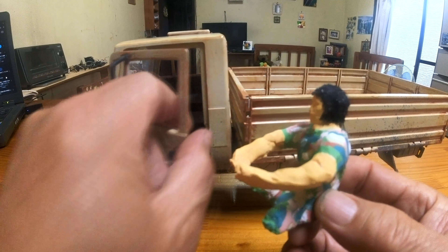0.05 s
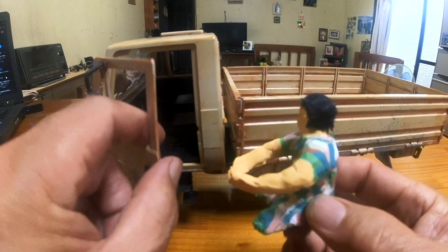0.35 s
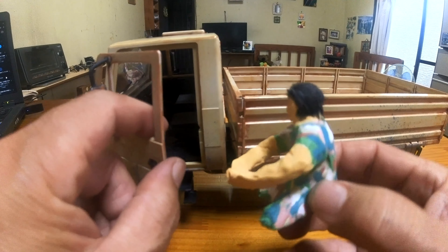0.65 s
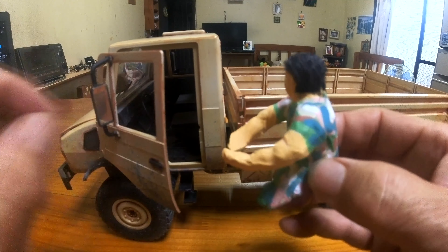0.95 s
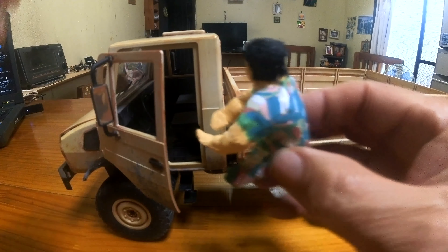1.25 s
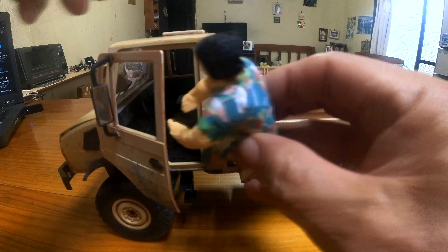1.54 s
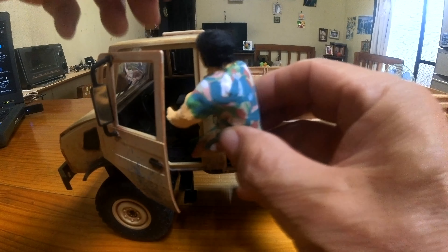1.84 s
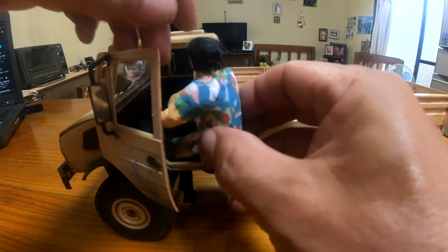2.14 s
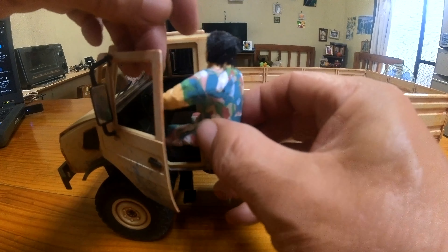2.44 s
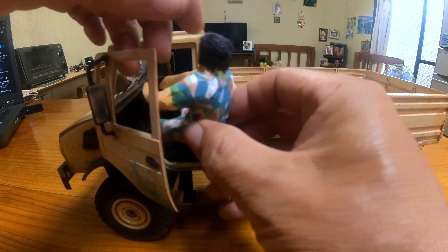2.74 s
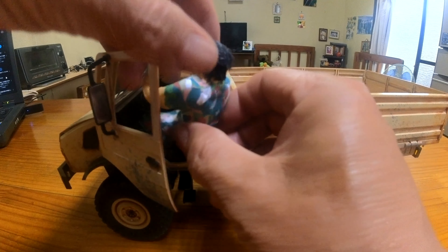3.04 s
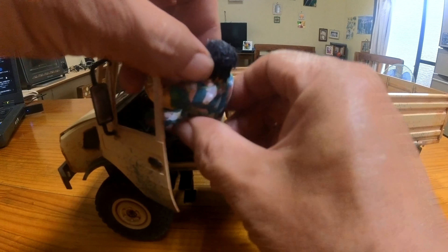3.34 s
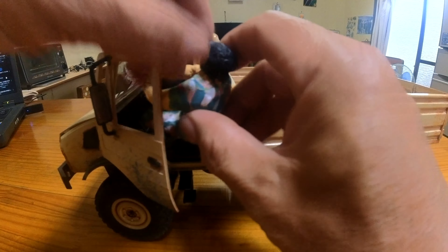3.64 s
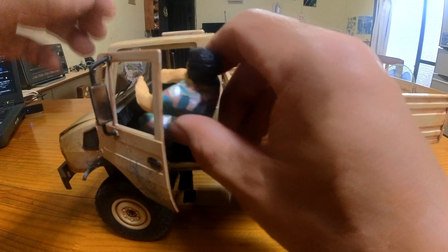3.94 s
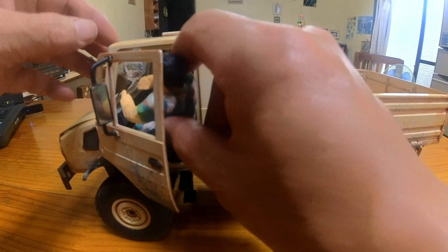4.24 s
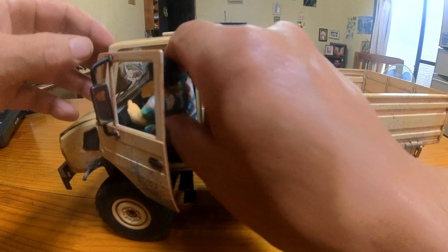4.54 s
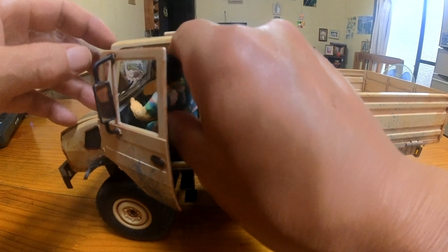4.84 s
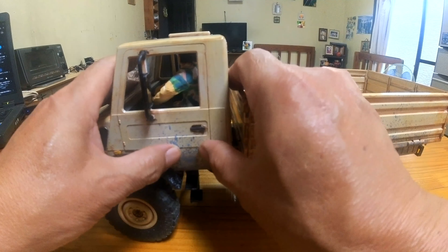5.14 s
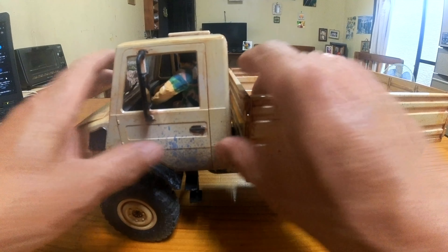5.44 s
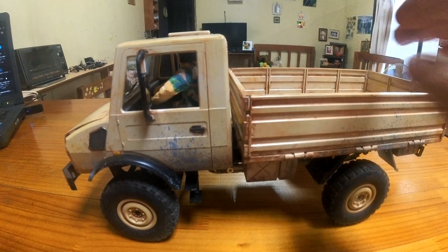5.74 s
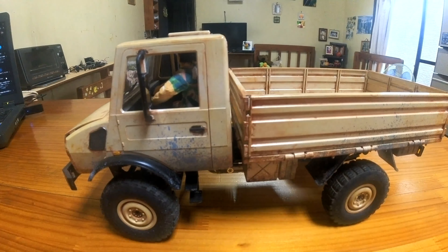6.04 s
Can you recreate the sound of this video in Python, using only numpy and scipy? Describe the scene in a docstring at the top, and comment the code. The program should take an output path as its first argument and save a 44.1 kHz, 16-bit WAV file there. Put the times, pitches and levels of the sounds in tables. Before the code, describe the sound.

A small plastic truck's door rasps open, a figure knocks and grates inside, and the door clicks closed in a quiet room.

```python
"""Hands seat a toy figure in the cab of a plastic model truck on a wooden table, close to the microphone.
The door drags open, the figure scrapes and knocks its way in, the door clicks shut, the truck rocks on
its tyres. Knocks make the plastic ring; scrapes are many tiny jerks as parts stick and slip.
A small room echoes the contacts. Hiss, a low hum, thin whines and faint chirps lie underneath."""
import sys
import numpy as np
from scipy import signal
from scipy.fft import rfft, irfft
from scipy.io import wavfile

SR = 44100
rng = np.random.default_rng(int(sys.argv[2]) if len(sys.argv) > 2 else 0)


def materialize(psi):
    """Save the field psi as 16-bit PCM at rate SR to the path in sys.argv[1].

    A 1-D psi becomes a single channel; in a 2-D psi each row is a channel.
    """
    bounded = np.clip(np.atleast_2d(psi).T, -1, 1)
    quanta = np.round(bounded * 32767).astype(np.int16)
    wavfile.write(sys.argv[1], SR, quanta)


N = 276948
HIT_SIZE = 22050  # samples in one short sound (half a second)

# The parts named in the tables of pushes and jolts.
# pitches each part rings at: pitch_hz, width_hz, gain_db
SEAT = [(296, 31, 10.5), (422, 30, 6.5), (570, 77, 0), (825, 120, 10.5), (1010, 200, 12), (1324, 43, 16.5),
        (1450, 51, 8.5), (1665, 130, 7), (2010, 330, 5), (2410, 71, 3.5), (2620, 160, -2),
        (3240, 420, -3.5), (5175, 240, 0), (5720, 120, -4.5), (6460, 400, -10.5)]  # seat under the sliding figure
WALL = [(432, 83, -8), (785, 72, -4), (1016, 67, 5), (1235, 100, 2), (1430, 150, 0), (1645, 120, -3.5),
        (2410, 180, -2), (2880, 270, -9.5), (3600, 300, -19), (4450, 180, -12.5), (5180, 280, -12.5)]  # back wall of the cab
CATCH = [(710, 100, -19), (920, 69, -5), (996, 51, 3), (1410, 250, -3), (1740, 120, -3.5), (1980, 210, 4),
         (2480, 380, -3), (2770, 240, -10), (3230, 230, -7.5), (3680, 150, -13), (5140, 840, -17),
         (6250, 560, -21.5), (6900, 200, -27)]  # door skin as the catch rides over the post
RIM = [(726, 46, 6), (1025, 120, -9), (1340, 92, 1.5), (1730, 220, -1.5), (2130, 330, -10), (2880, 300, -5),
       (3520, 170, -5), (4430, 360, -12), (5170, 220, -2), (5850, 130, -15)]  # door rim creeping home
CAB = [(150, 52, 5), (225, 93, 8), (315, 87, 7.5), (404, 94, 6.5), (626, 40, 0), (753, 93, 8.5),
       (893, 150, 12.5), (1050, 190, 3), (1253, 150, 9), (1700, 95, -0.5), (1990, 210, -1),
       (2280, 490, -4.5), (2700, 290, 0.5), (3550, 300, -18), (4850, 440, -12)]  # cab knocked from inside
FIGURE = [(758, 41, 12), (863, 62, 8), (1490, 86, 6.5), (2210, 240, -4), (2690, 140, 7), (2950, 130, 3.5),
          (3715, 210, 12.5), (4800, 72, 12), (5250, 165, 8), (6200, 450, -13), (7200, 500, -11),
          (7940, 420, -14.5), (10000, 730, -34)]  # the figure's hard shell
DOOR_EDGE = [(741, 100, 2), (1710, 130, -13), (2270, 300, -20.5), (4240, 230, -33), (5400, 220, -36)]  # door edge meeting the post
FRAME = [(313, 63, 14), (422, 70, 14), (530, 130, 11.5), (623, 53, 18.5), (733, 60, 17.5), (850, 140, 9),
         (1085, 89, 9.5), (1420, 300, 4.5), (2280, 97, 9.5), (2560, 190, 11.5), (2990, 210, 14.5),
         (3630, 350, -3), (5100, 700, -22)]  # frame with the door shut in it
# which side each part's sound leans to: pitch_hz, left_minus_right_db
SEAT_LEAN = [(60, 4), (100, -13), (180, -7), (300, -4.5), (520, 10), (880, -0.5), (1510, 1), (2580, 5.5),
             (4420, -9), (7570, -25)]
WALL_LEAN = [(60, -1), (100, -4), (180, -7), (300, -8), (520, -1.0), (880, 3), (1510, 1), (2580, 19),
             (4420, 1), (7570, -9)]
CATCH_LEAN = [(60, 0.5), (100, 3.5), (180, -4), (300, 0), (520, 0.5), (880, 1.5), (1510, 2), (2580, 5),
              (4420, -1), (7570, -16)]
RIM_LEAN = [(60, 10), (100, 6), (180, 0), (300, 0.0), (520, -7), (880, 7), (1510, -1), (2580, 7),
            (4420, -6), (7570, -26)]
CAB_LEAN = [(60, 15), (100, -3), (180, 3), (300, -4), (520, 7.5), (880, 0), (1510, 4), (2580, 11),
            (4420, 7), (7570, -15)]
FIGURE_LEAN = [(60, 8), (100, 5), (180, -2.5), (300, 6), (520, 9), (880, 4), (1510, 8), (2580, 2),
               (4420, -11.5), (7570, -18)]
DOOR_EDGE_LEAN = [(60, 5), (100, 3), (180, 11), (300, 7), (520, -3.5), (880, 3.0), (1510, 10), (2580, 10),
                  (4420, -15), (7570, -4.0)]
FRAME_LEAN = [(60, 0), (100, 0), (180, 5), (300, -2.5), (520, -2), (880, 3), (1510, 2.5), (2580, 4.5),
              (4420, -2), (7570, 7)]


def undb(db):
    """Turn decibels into a factor to multiply by."""
    return 10 ** (np.asarray(db) / 20)


def unit(x):
    """Scale a sound to an average (rms) level of 1."""
    return x / np.sqrt(np.mean(x ** 2) + 1e-30)


def lookup(table, hz):
    """Read between the rows of a (pitch_hz, value) table, giving each octave equal room."""
    points, values = np.transpose(table)
    return np.interp(np.log(hz + 1), np.log(points), values)


def band(x, low_hz, high_hz, order=5):
    """Keep the sound between two pitches."""
    sos = signal.butter(order, [low_hz, min(high_hz, SR / 2 - 1)], "band", fs=SR, output="sos")
    return signal.sosfilt(sos, x + 1e-18)


def shape(x, table):
    """Filter by (pitch_hz, gain_db) points, with no ringing ahead of the sound."""
    size = 2 * HIT_SIZE
    hz = np.arange(HIT_SIZE + 1) * SR / size
    cepstrum = irfft(np.log(undb(lookup(table, hz))))
    # move the filter's early half to after the sound
    cepstrum[1:HIT_SIZE] *= 2
    cepstrum[HIT_SIZE + 1:] = 0
    return irfft(rfft(x, size) * np.exp(rfft(cepstrum)))[:, :HIT_SIZE]


def wander(turns_per_s, size):
    """A random drift, mostly between -1 and 1."""
    at = np.arange(size) / SR * turns_per_s
    return np.interp(at, np.arange(4096), rng.standard_normal(4096))


def add(out, start_s, sound):
    """Mix a sound in at its start time."""
    start = max(int(start_s * SR), 0)
    sound = sound[:, :N - start]
    out[:, start:start + sound.shape[1]] += sound


def stereo_noise(alike_hz=2300, bass_width=.2):
    """Noise whose left and right are alike in the bass and unrelated in the treble."""
    hz = np.arange(HIT_SIZE // 2 + 1) * SR / HIT_SIZE
    width = np.hypot(bass_width, hz / np.hypot(hz, alike_hz))
    mid, side = rfft(rng.standard_normal((2, HIT_SIZE)))
    return irfft((mid + width * side * np.array([[1], [-1]])) / np.hypot(1, width), HIT_SIZE)


def background(hiss_db=-69):
    """Steady room hiss with a wavering hum and two thin whines."""
    # tone of the quiet room: pitch_hz, gain_db
    air_tone = [(20, -33), (50, 1.5), (76, -3.5), (110, -6), (230, -8.5), (500, -15.5), (1000, -17),
                (2500, -21), (3600, -20), (5300, -16.5), (7800, -27.5), (10400, -42.5), (15500, -45),
                (17000, -75)]
    # what differs between the ears (side) against what they share (mid): pitch_hz, side_db
    air_width = [(50, -4.5), (150, -4), (900, -4), (2500, -1), (5000, 0.5)]
    # hum and whines: pitch_hz, level_db, waver_fraction
    tones = [(49, -73, .4), (1007, -78.5, .35), (8005, -95, .9)]
    hz = np.arange(N // 2 + 1) * SR / N
    mid, side = irfft(rfft(rng.standard_normal((2, N))) * undb(lookup(air_tone, hz)), N)
    side = irfft(rfft(side) * undb(lookup(air_width, hz)), N)
    audible_level = np.std(band(mid, 100, 15500))
    air = (mid + side * np.array([[1], [-1]])) / audible_level * undb(hiss_db)
    t = np.arange(N) / SR
    for pitch_hz, level_db, waver in tones:
        sway = 1 + waver * (wander(39, N) + 1j * wander(29, N))  # shakes level and pitch
        air += undb(level_db) * unit(np.real(sway * np.exp(2j * np.pi * pitch_hz * t)))
    return air


def room_echo(build_s=0.0036):
    """The echo of one click off table and walls; the treble dies first."""
    # time the echo takes to fall 60 dB: pitch_hz, fade_s
    fades = [(150, 0.14), (500, 0.21), (1000, 0.22), (3000, 0.21), (8000, 0.097)]
    t = np.arange(HIT_SIZE) / SR
    noise = stereo_noise(alike_hz=2120, bass_width=0.22)
    edges_hz = np.geomspace(60, 15360, 9)
    echo = sum(band(noise, low, high, order=3) * undb(-60 * t / lookup(fades, np.sqrt(low * high)))
               for low, high in zip(edges_hz, edges_hz[1:]))
    echo *= 1 - np.exp(-(t / build_s) ** 2)
    return echo / np.sqrt(np.sum(echo ** 2) / 2)


def in_room(x, echo, echo_db):
    """The direct sound plus its echo."""
    return x + undb(echo_db) * signal.fftconvolve(np.atleast_2d(x), echo, axes=1)[:, :HIT_SIZE]


def glide(length_s, first_hz, last_hz, jitter, roughness):
    """A rough tone that swells, slides to its last pitch and fades."""
    progress = np.minimum(np.arange(HIT_SIZE) / SR / length_s, 1)
    hz = last_hz + (first_hz - last_hz) * (1 - progress) ** 2
    hz *= 1 + jitter * wander(153, HIT_SIZE)
    flutter = 1 + roughness * (wander(164, HIT_SIZE) + 1j * wander(170, HIT_SIZE))
    swell = np.sin(np.pi * np.sqrt(progress))
    return swell * np.imag(flutter * np.exp(2j * np.pi * np.cumsum(hz) / SR))


def chirps(echoes, length_s=0.0754, gain_db=-1):
    """Very faint high chirps, like birds beyond the window."""
    # chirps: start_s, first_hz, last_hz, level_db (before gain_db)
    notes = [(.3, 3500, 3670, -66.5), (.65, 3670, 3600, -74), (1.28, 3220, 3030, -78),
             (1.37, 3150, 2940, -76), (1.45, 2980, 2880, -80), (1.78, 3500, 3640, -74),
             (2.2, 3290, 3460, -69.5), (2.37, 3570, 3660, -70), (3.95, 3360, 3240, -74),
             (4.33, 3560, 3560, -78), (5.87, 2990, 3150, -75.5), (6, 3120, 3020, -68)]
    out = np.zeros((2, N))
    for k, (start_s, first_hz, last_hz, level_db) in enumerate(notes):
        note = glide(length_s, first_hz, last_hz, jitter=.018, roughness=.9)
        add(out, start_s, undb(level_db + gain_db) * in_room(note, echoes[k % len(echoes)], echo_db=-3))
    return out


def finger_rustle(patchy_db=6, touches_per_s=14, hands_off_s=5.6):
    """Fingers shift their grip, rustling in faint patches until they let go."""
    # skin on plastic: pitch_hz, width_hz, level_db
    rustle_bands = [(2996, 480, -79.5), (3596, 350, -78), (5220, 720, -86.5)]
    holding = np.clip((hands_off_s - np.arange(N) / SR) * 10, 0, 1)
    out = 0
    for hz, width_hz, level_db in rustle_bands:
        touch_db = patchy_db * wander(touches_per_s, N).clip(-2, 2) + 2 * wander(10 * touches_per_s, N)
        hiss = band(rng.standard_normal((2, N)), hz - width_hz / 2, hz + width_hz / 2, order=2)
        out += undb(level_db) * unit(undb(touch_db) * hiss)
    return out * holding


def squeaks(echo):
    """Hinge and fingertips slip so regularly that they make a sliding tone."""
    # squeaks: start_s, length_s, first_hz, last_hz, level_db
    slides = [(0.386, 0.14, 1480, 1255, -64), (1.173, 0.077, 294, 265, -62),
              (3.89, 0.067, 2720, 2650, -63.5), (3.955, 0.066, 967, 1060, -63),
              (3.958, 0.103, 2520, 2760, -66), (4.17, 0.067, 2510, 2470, -68),
              (4.925, 0.13, 337, 271.4, -47)]
    out = np.zeros((2, N))
    for start_s, length_s, first_hz, last_hz, level_db in slides:
        tone = glide(length_s, first_hz, last_hz, jitter=.025, roughness=.55)
        add(out, start_s, undb(level_db) * in_room(tone, echo, echo_db=-7))
    return out


def ring(hz, fade_s):
    """One note of a struck object, falling 60 dB in fade_s."""
    t = np.arange(HIT_SIZE) / SR
    return np.sin(2 * np.pi * hz * t) * undb(-60 * t / fade_s)


def tyre_thumps(echoes, push_s=0.0013, gain_db=-1):
    """Soft pushes set the truck bouncing on its tyres and the table top."""
    # bounces: start_s, peak_db (before gain_db), pitch_hz, fade_s
    bounces = [(.488, -49.5, 47.6, 0.013), (.728, -42, 146, 0.062), (.992, -41.5, 133.5, 0.32),
               (1.048, -46, 128.7, 0.19), (1.123, -50, 66, 0.083), (2.8405, -29, 192, 0.037),
               (2.854, -38.5, 256, 0.08), (4.82, -46, 152.2, 0.33), (4.842, -39.5, 55, 0.087),
               (5.133, -50, 282, 0.061), (5.434, -42.5, 173, 0.13), (5.498, -38.5, 124, 0.021),
               (5.598, -52, 137, 0.13)]
    out = np.zeros((2, N))
    push = 1 - np.exp(-np.arange(HIT_SIZE) / SR / push_s)
    for k, (start_s, peak_db, hz, fade_s) in enumerate(bounces):
        bounce = in_room(ring(hz, fade_s) * push, echoes[k % len(echoes)], echo_db=-2)
        add(out, start_s, undb(peak_db + gain_db) * bounce / np.abs(bounce).max())
    return out


def cab_shell(scatter_db=7.5, detune=0.012, held_fade_s=.21):
    """The cab rings differently wherever it is touched; the hands cut long rings short."""
    # the cab's own notes: pitch_hz, gain_db, fade_s (capped at held_fade_s)
    notes = [(264, 27.5, 0.0061), (318, -9, 0.12), (405, -16, 0.12), (490, 0, 0.018), (588, -2, 0.12),
             (737, -4, 0.14), (818, 14.5, 0.024), (980, -32, 0.25), (983, -0.5, 0.61), (1144, 14, 0.013),
             (1114, -22, 0.011), (1307, -19, 0.055), (1420, -7, 0.25), (1745, 2, 0.015), (2060, -35, 0.074),
             (2224, -3.5, 0.057), (2400, -8.5, 0.019), (2470, -6, 0.011), (3050, 8, 0.015),
             (3420, 2, 0.063), (3500, -11, 0.05), (5020, -1, 0.048), (5200, -33, 0.036),
             (6000, -13, 0.0098)]
    chance = rng.standard_normal((len(notes), 3))
    out = 0
    for (hz, gain_db, fade_s), (size, grip, side) in zip(notes, chance):
        strength = np.sign(side) * undb(gain_db + scatter_db * size)
        out += strength * ring(hz * (1 + detune * grip), min(fade_s, held_fade_s))
    return out


def panel(low_hz, high_hz, fade_s, high_db):
    """The touched part rings at two pitches of its own."""
    return ring(low_hz, fade_s) + undb(high_db) * ring(high_hz, fade_s)


def crack(contact_s):
    """Touching edges shake in a very short burst of noise."""
    age = np.arange(HIT_SIZE) / SR / contact_s
    burst = stereo_noise(alike_hz=2750, bass_width=0.13) * age * np.exp(-age)
    return burst / np.sqrt(np.sum(burst ** 2) / 2)


def through_body(x, level_db, low_hz, high_hz, tilt, fall, seconds):
    """The body and the touched part colour a contact, set to level_db over its first seconds."""
    # how well the plastic body gives off sound: pitch_hz, gain_db
    body_tone = [(80, -0.5), (160, -11.5), (260, 7.5), (400, 6), (500, -3), (680, 0.5), (1000, 5),
                 (1300, 0), (2200, 6), (3000, 0), (3650, 2.5), (4250, 6.5), (5200, -8), (7000, 7.5),
                 (10000, -38), (14000, -99.5)]
    # where the cab's sound leans: pitch_hz, left_minus_right_db
    body_lean = [(200, -3), (450, 2.5), (1000, 1.5), (2000, 6), (3100, 16), (3900, -5.5), (5200, -25),
                 (8000, 7.5)]
    margin_octaves, floor_db = 0.032, -29  # the rest of the truck still carries floor_db
    hz = np.geomspace(40, 20000, 80)
    # octaves below, above and between the part's two rings
    over_low, under_high = np.log2(hz / low_hz), np.log2(high_hz / hz)
    below = np.maximum(-over_low - margin_octaves, 0)
    above = np.maximum(-under_high - margin_octaves, 0)
    between = np.maximum(np.minimum(over_low, under_high), 0)
    slope_db = tilt * np.log2(np.clip(hz, low_hz, high_hz) / low_hz)
    part_db = slope_db - 12 * below + between - fall * above
    gain_db = lookup(body_tone, hz) + np.maximum(part_db, floor_db)
    lean_db = lookup(body_lean, hz)
    x = np.vstack([shape(channel[None], np.column_stack([hz, gain_db + side * lean_db / 2]))
                   for channel, side in zip(x, (1, -1))])
    return x * undb(level_db) / np.std(x[:, :int(seconds * SR)])


def through_part(x, part, lean, level_db, seconds):
    """A part boosts the pitches it rings at; the result has level_db over its first seconds."""
    hz = np.geomspace(40, 20000, 900)
    power = sum(undb(peak_db) ** 2 / (1 + ((hz - pitch_hz) / width_hz * 1.5) ** 2) ** 2
                for pitch_hz, width_hz, peak_db in part)
    shares = [2 / (1 + undb(-side * lookup(lean, hz)) ** 2) for side in (1, -1)]  # left, right
    x = np.vstack([shape(channel[None], np.column_stack([hz, 10 * np.log10(power * share + 1e-8)]))
                   for channel, share in zip(x, shares)])
    return x * undb(level_db) / np.std(x[:, :int(seconds * SR)])


def pressure(swell_s, hold_s):
    """A fingertip push builds, holds, then lets go quickly."""
    t = np.arange(HIT_SIZE) / SR
    return np.minimum(t / swell_s, 1) * np.exp(-(np.maximum(t - swell_s, 0) / hold_s) ** 4)


def jerks(spread_db):
    """A random size and direction for each possible slip."""
    size = undb(spread_db * rng.standard_normal(HIT_SIZE).clip(-2, 2))
    return size * np.sign(rng.standard_normal(HIT_SIZE))


def rasp(swell_s, hold_s, slips_per_s, spread_db, grip_db):
    """Tiny slips grow stronger and weaker as the grip catches and gives."""
    strength = jerks(spread_db) * undb(grip_db * wander(174, HIT_SIZE))
    slipping = rng.random(HIT_SIZE) < slips_per_s / SR
    return slipping * strength * pressure(swell_s, hold_s)


def scrapes(echoes, slips_per_s=1500, crack_db=36, panel_db=7):
    """Fingers and loose parts stick and slip on the body, shaking the cab and the sliding part."""
    # scrapes: start_s, swell_s, hold_s, level_db, low_hz, high_hz (the part's two rings),
    # tilt_db_per_octave (between them), fall_db_per_octave (above them)
    strokes = [(.3, 0.0064, 0.1, -61, 384, 1400, -2.5, 6.5), (.485, 0.01, 0.017, -66.5, 230, 3120, 4.5, 0),
               (.73, 0.0023, 0.0033, -60.5, 200, 1420, -1, 22),
               (.96, 0.0046, 0.014, -52, 2400, 2720, -2, 30),
               (3.545, 0.028, 0.036, -61.5, 5150, 5350, -16, 25),
               (3.875, 0.009, 0.023, -59.5, 2010, 3030, 8, 31),
               (4.61, 0.021, 0.045, -61.5, 1010, 2807, 6.5, 20),
               (5.47, 0.0052, 0.053, -50.5, 302, 850, 2, 16)]
    out = np.zeros((2, N))
    for k, (start_s, swell_s, hold_s, level_db, low_hz, high_hz, tilt, fall) in enumerate(strokes):
        slips = jerks(spread_db=3) * (rng.random(HIT_SIZE) < slips_per_s / SR)
        slips *= pressure(swell_s, hold_s)
        rings = cab_shell() + undb(panel_db) * panel(low_hz, high_hz, fade_s=0.078, high_db=0.5)
        one_slip = rings + undb(crack_db) * crack(contact_s=0.0013)
        rub = signal.fftconvolve(slips[None], one_slip, axes=1)[:, :HIT_SIZE]
        heard = in_room(rub, echoes[k % len(echoes)], echo_db=-6)
        add(out, start_s, through_body(heard, level_db, low_hz, high_hz, tilt, fall, swell_s + hold_s))
    return out


def door_pull(echo, start_s=0.97, swell_s=0.0099, hold_s=0.043, level_db=-39.5):
    """The tight door drags out of its frame with a dense rasp, then rings on."""
    # tone of the dragging door: pitch_hz, width_hz, gain_db
    door_tone = [(242, 85, 3.5), (503, 46, -10.5), (838, 89, 2), (964, 82, 11), (1250, 180, 4),
                 (1768, 120, 10), (2070, 300, -0.5), (2360, 160, 2), (2630, 350, 7.5), (3160, 320, 0),
                 (3710, 520, -4), (4930, 660, -15), (7100, 800, -22.5)]
    # where its sound leans: pitch_hz, left_minus_right_db
    door_lean = [(60, 9), (100, 3), (180, 1), (300, -7), (520, 0.5), (880, 5), (1510, -5.5), (2580, 14),
                 (4420, -14), (7570, -10.5)]
    # notes of the freed door: pitch_hz, gain_db, fade_s
    door_notes = [(996, -53.5, 0.22), (1715, -53.5, 0.25), (2382, -54, 0.32), (3120, -50.5, 0.29),
                  (3340, -41, 0.19)]
    out = np.zeros((2, N))
    drag = rasp(swell_s, hold_s, slips_per_s=3000, spread_db=3.5, grip_db=-1)
    rings = sum(undb(gain_db) * ring(hz, fade_s) for hz, gain_db, fade_s in door_notes)
    drag += signal.fftconvolve(drag, rings)[:HIT_SIZE]
    heard = in_room(drag, echo, echo_db=-3)
    add(out, start_s, through_part(heard, door_tone, door_lean, level_db, swell_s + hold_s))
    return out


def latch(start_s=4.9235, gain_db=-41.5, decay_s=.0004):
    """The door catch snaps over with one very short bright tick."""
    out = np.zeros((2, N))
    tick = stereo_noise() * np.exp(-np.arange(HIT_SIZE) / SR / decay_s)
    add(out, start_s, undb(gain_db) * band(tick, 3000, 17000, order=2))
    return out


def knocks(echoes, crack_db=33, panel_db=14):
    """Each blow cracks, then rings the cab and the struck panel; softer blows carry more echo."""
    # knocks on door and cab: start_s, level_db, contact_s, low_hz, high_hz (the panel's two rings),
    # tilt_db_per_octave (between them), fall_db_per_octave (above them)
    blows = [(.0006, -45.5, 0.00098, 370, 870, -11.5, 2), (.2427, -65, 0.0028, 1815, 3050, 9, 25),
             (.2735, -59.5, 0.0017, 936, 1853, 8, 3.5), (.7094, -65.5, 0.002, 753, 1826, 1.5, -3.5),
             (2.0356, -66, 0.00037, 762, 823, -14, 52), (2.188, -69, 0.0079, 430, 425, 6, 15),
             (2.864, -46.5, 0.0055, 950, 1030, -6, 19), (4.085, -67.5, 0.0066, 875, 906, -7, 12),
             (4.419, -56, 0.0058, 397.5, 826, -10.5, 39), (4.472, -64, 0.025, 398, 403, -6, 5.5),
             (4.645, -55.5, 0.0083, 391, 786, 0.5, 9.5), (4.8012, -50, 0.0023, 451, 1520, -4.5, 23),
             (4.819, -56, 0.0002, 754, 1550, -21, 17), (5.2704, -59.5, 0.004, 980, 1310, 0, 8),
             (5.292, -62, 0.0029, 678, 3200, -5.5, 17), (5.388, -51, 0.0017, 1003, 1660, -4.5, 5.5),
             (5.444, -47.5, 0.0025, 390, 720, -3, 9.5)]
    out = np.zeros((2, N))
    t = np.arange(HIT_SIZE) / SR
    for k, (start_s, level_db, contact_s, low_hz, high_hz, tilt, fall) in enumerate(blows):
        rings = cab_shell() + undb(panel_db) * panel(low_hz, high_hz, fade_s=0.031, high_db=1.5)
        blow = rings * (1 - np.exp(-t / contact_s)) + undb(crack_db) * crack(contact_s)
        softness = np.log2(contact_s / .001)
        heard = in_room(blow, echoes[k % len(echoes)], echo_db=-6 + 3 * softness)
        add(out, start_s, through_body(heard, level_db, low_hz, high_hz, tilt, fall, seconds=0.13))
    return out


def shoves(echoes):
    """Tight parts grate in short pushes: the figure into its seat, then the door into its frame."""
    # pushes: start_s, swell_s, hold_s, level_db, lowest_hz, echo_db, part, lean
    pushes = [(3.372, 0.0018, 0.11, -42.5, 660, -5, SEAT, SEAT_LEAN),
              (3.433, 0.011, 0.016, -34, 400, -11, SEAT, SEAT_LEAN),
              (3.464, 0.0023, 0.027, -47, 261, -6, SEAT, SEAT_LEAN),
              (3.643, 0.011, 0.031, -47.5, 300, -12.5, WALL, WALL_LEAN),
              (3.682, 0.003, 0.055, -49.5, 300, -6.5, WALL, WALL_LEAN),
              (4.9225, .001, 0.017, -40.5, 500, -5, CATCH, CATCH_LEAN),
              (4.944, 0.0024, 0.046, -50, 500, -1, CATCH, CATCH_LEAN),
              (5.076, 0.0012, 0.0044, -43, 496, -3, RIM, RIM_LEAN)]
    out = np.zeros((2, N))
    for k, (start_s, swell_s, hold_s, level_db, lowest_hz, echo_db, part, lean) in enumerate(pushes):
        slips = rasp(swell_s, hold_s, slips_per_s=1700, spread_db=4.5, grip_db=1)
        grate = band(slips, lowest_hz, 16000, order=3)
        heard = in_room(grate, echoes[k % len(echoes)], echo_db)
        add(out, start_s, through_part(heard, part, lean, level_db, swell_s + hold_s))
    return out


def clacks(echoes):
    """Hard jolts ring one part each: the figure hits cab and post, then the door hits post and frame."""
    # jolts: start_s, level_db, rattle_s, rattle_db, echo_db, dull_hz (the echo dulls above), part, lean
    jolts = [(2.8395, -40, 0.0014, 5, -2.5, 2000, CAB, CAB_LEAN),
             (3.018, -43, 0.001, -3.5, -8.5, 7100, FIGURE, FIGURE_LEAN),
             (4.9132, -39.5, 0.0012, 11, -9.5, 2000, DOOR_EDGE, DOOR_EDGE_LEAN),
             (5.132, -38.5, 0.0014, -7.5, -1, 1410, FRAME, FRAME_LEAN)]
    out = np.zeros((2, N))
    for k, (start_s, level_db, rattle_s, rattle_db, echo_db, dull_hz, part, lean) in enumerate(jolts):
        jolt = signal.unit_impulse(HIT_SIZE) + undb(rattle_db) * crack(rattle_s)
        heard = in_room(jolt, band(echoes[k], 60, dull_hz, order=1), echo_db)
        add(out, start_s, through_part(heard, part, lean, level_db, seconds=0.088))
    return out


def scene():
    """Hits and rubbing over the quiet room, with echoes for five spots on the table."""
    echoes = [room_echo() for _ in range(5)]
    hits = clacks(echoes) + knocks(echoes) + latch() + tyre_thumps(echoes)
    rubbing = door_pull(echoes[3]) + shoves(echoes) + scrapes(echoes) + squeaks(echoes[0])
    return hits + rubbing + finger_rustle() + chirps(echoes) + background()


def record(dry):
    """Cut off the highest treble."""
    top_hz = 15700
    return signal.sosfilt(signal.ellip(8, .2, 70, top_hz, fs=SR, output="sos"), dry)


dry = scene()
out = record(dry)
materialize(out)
```